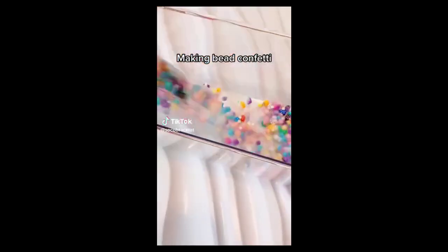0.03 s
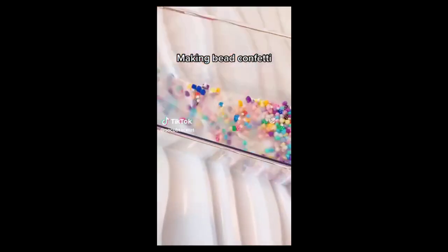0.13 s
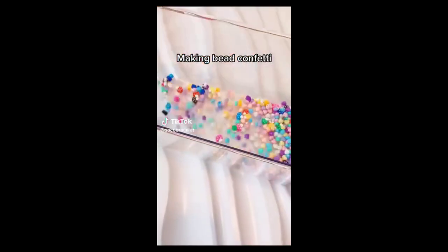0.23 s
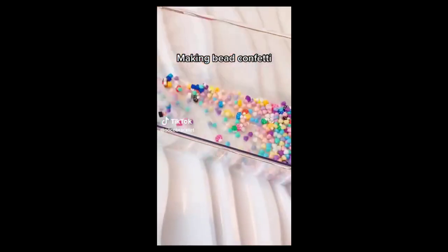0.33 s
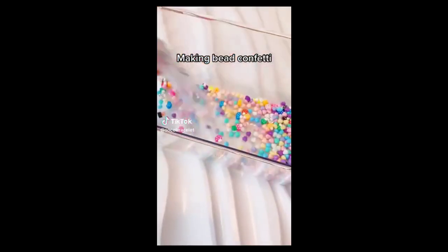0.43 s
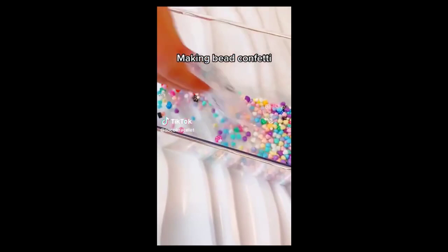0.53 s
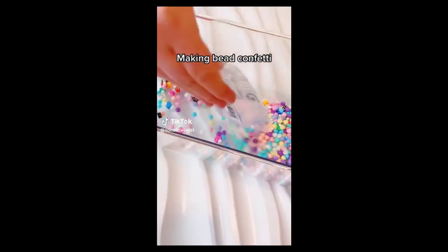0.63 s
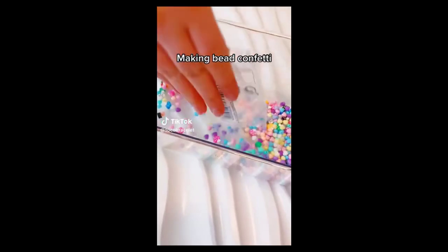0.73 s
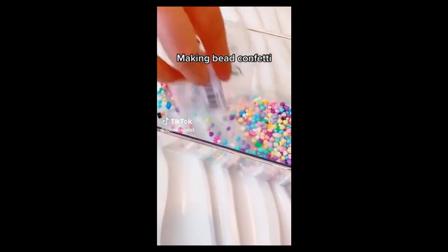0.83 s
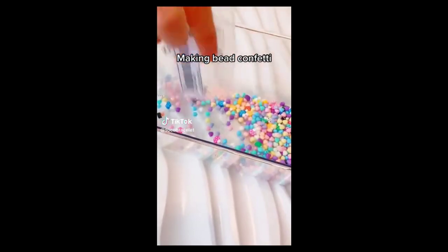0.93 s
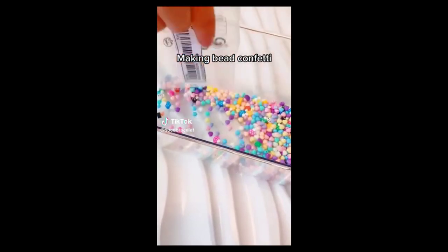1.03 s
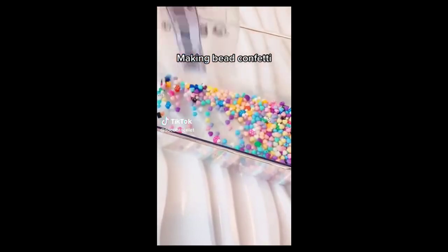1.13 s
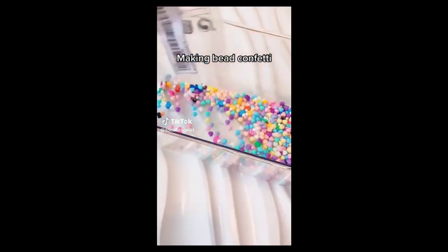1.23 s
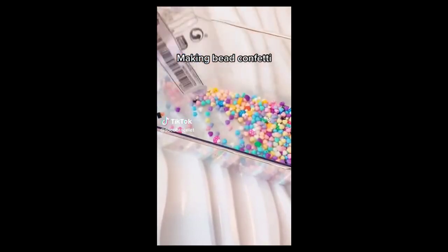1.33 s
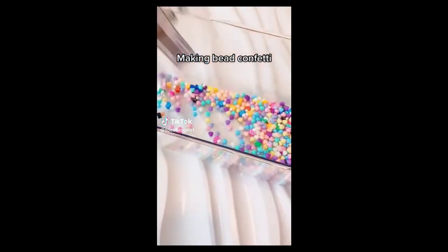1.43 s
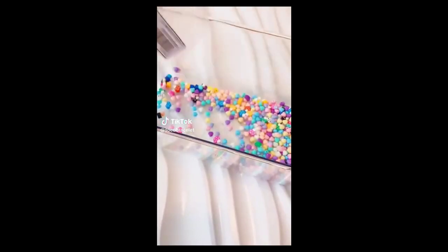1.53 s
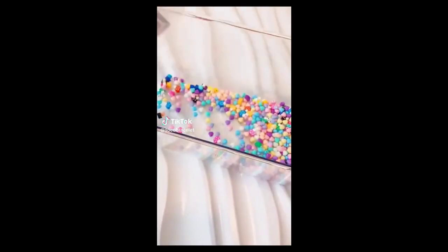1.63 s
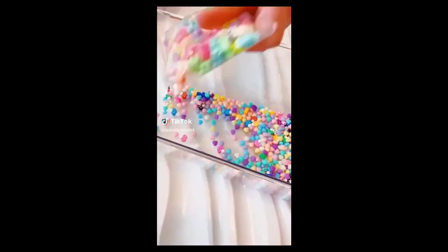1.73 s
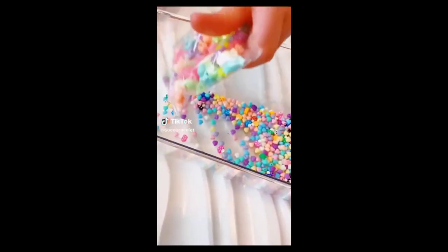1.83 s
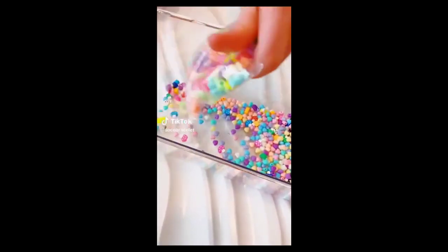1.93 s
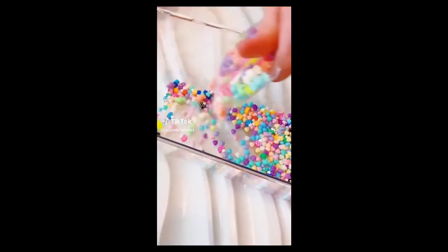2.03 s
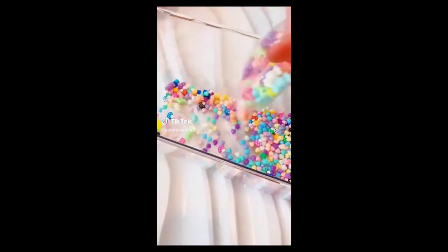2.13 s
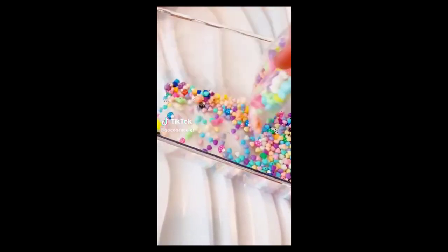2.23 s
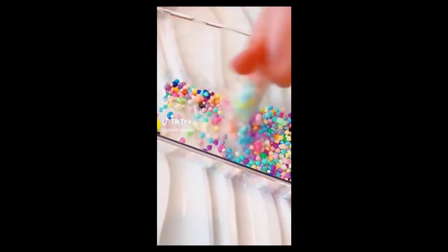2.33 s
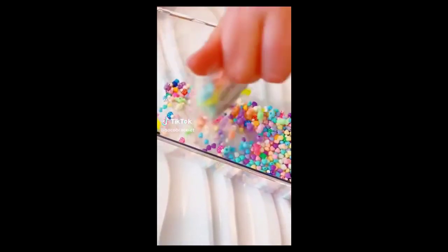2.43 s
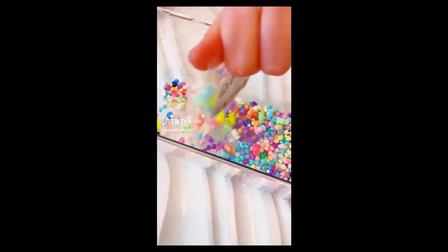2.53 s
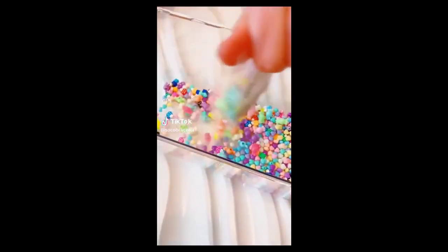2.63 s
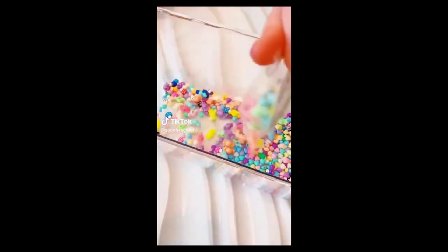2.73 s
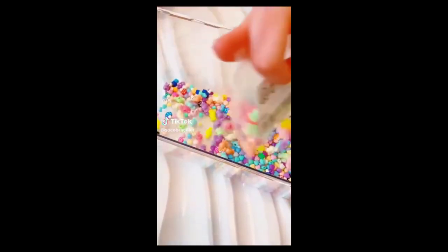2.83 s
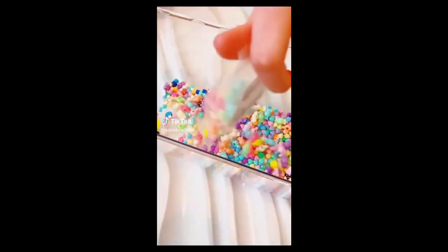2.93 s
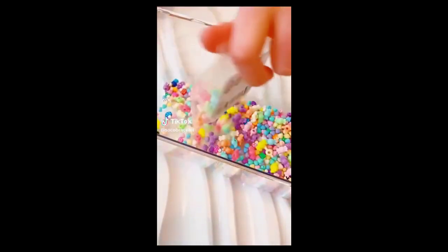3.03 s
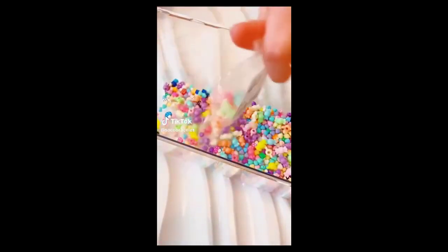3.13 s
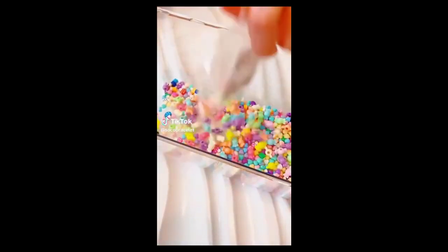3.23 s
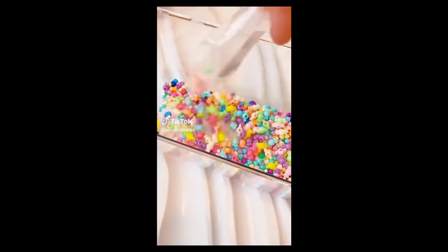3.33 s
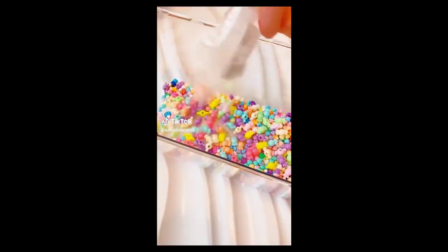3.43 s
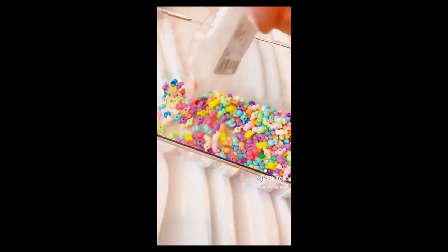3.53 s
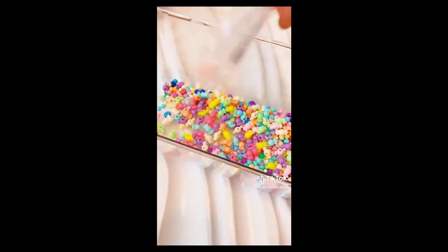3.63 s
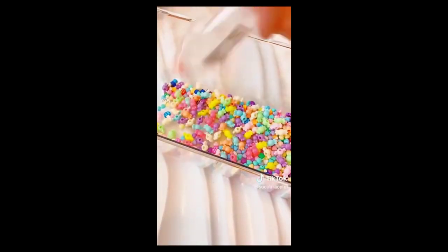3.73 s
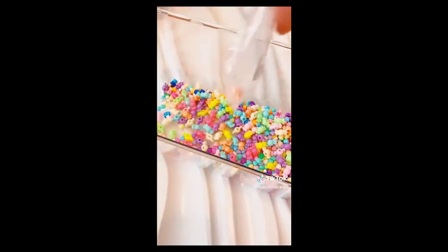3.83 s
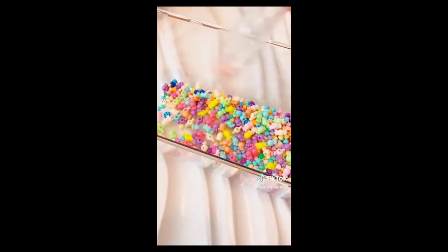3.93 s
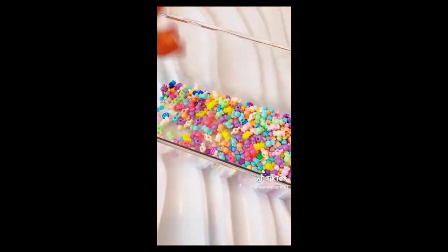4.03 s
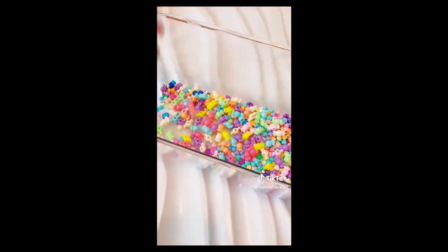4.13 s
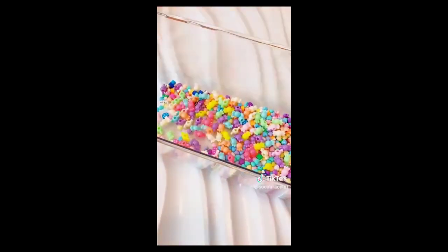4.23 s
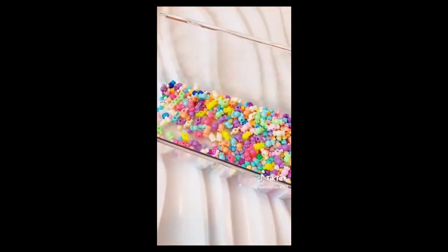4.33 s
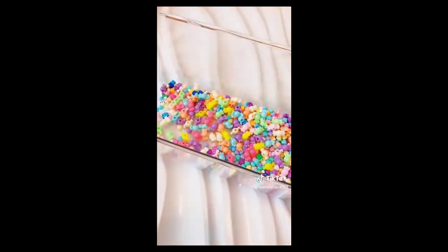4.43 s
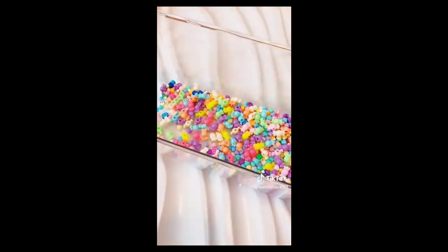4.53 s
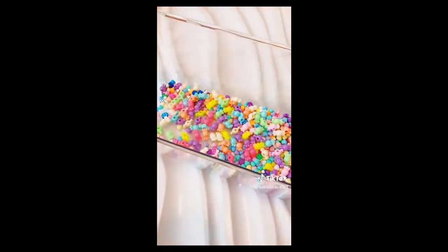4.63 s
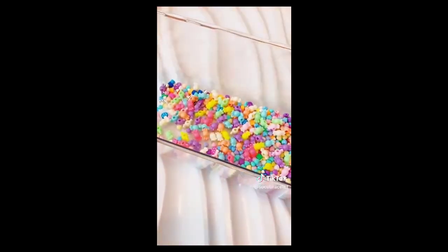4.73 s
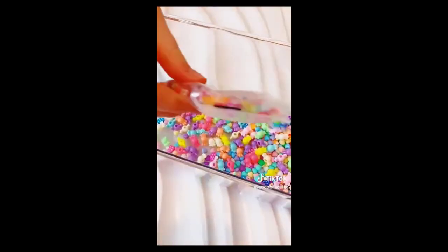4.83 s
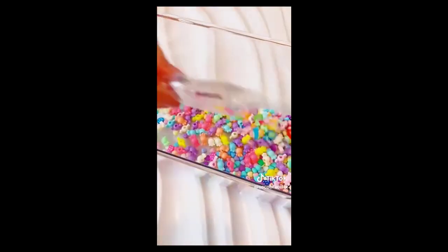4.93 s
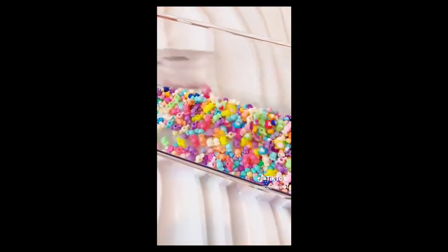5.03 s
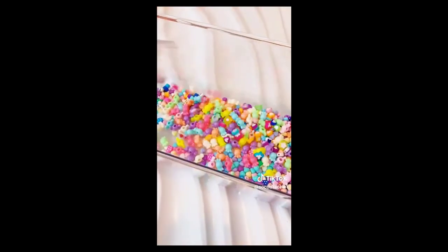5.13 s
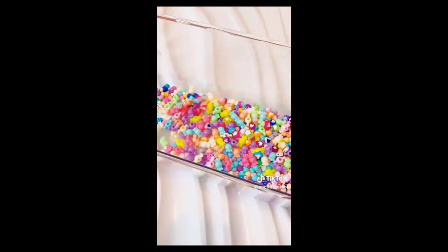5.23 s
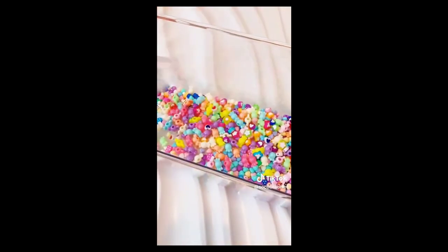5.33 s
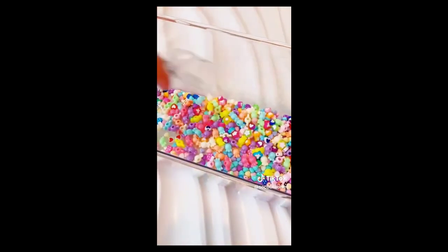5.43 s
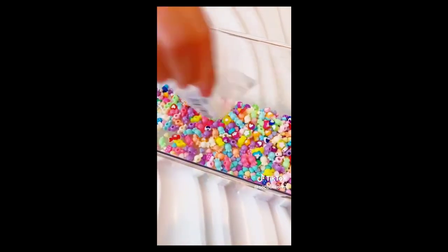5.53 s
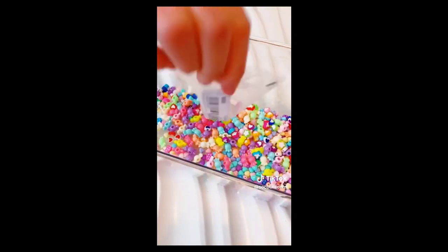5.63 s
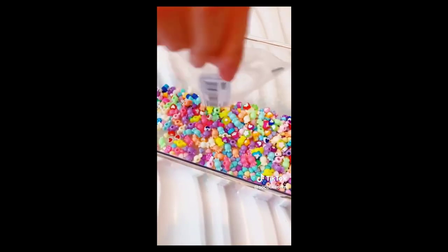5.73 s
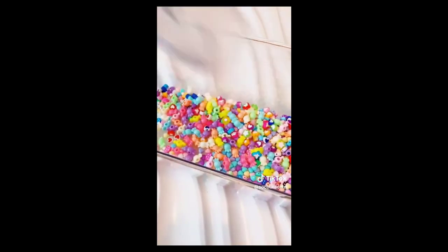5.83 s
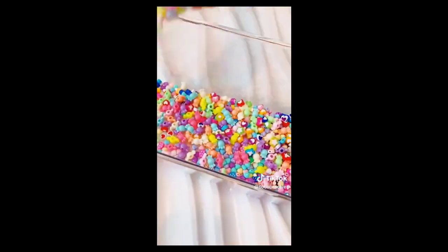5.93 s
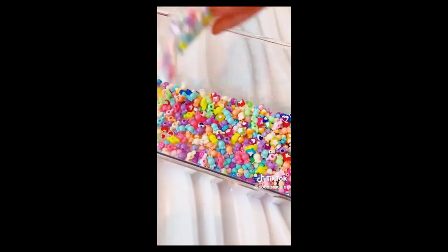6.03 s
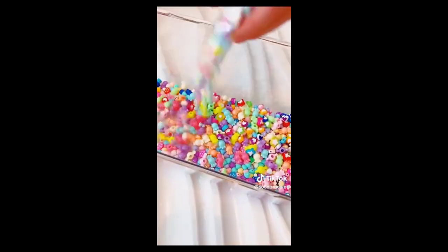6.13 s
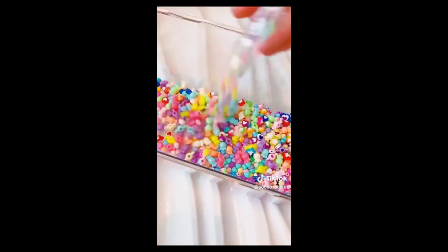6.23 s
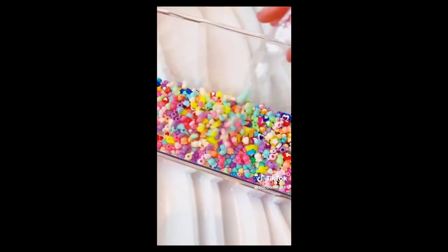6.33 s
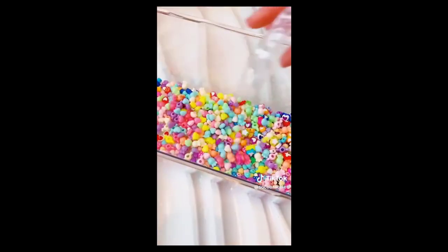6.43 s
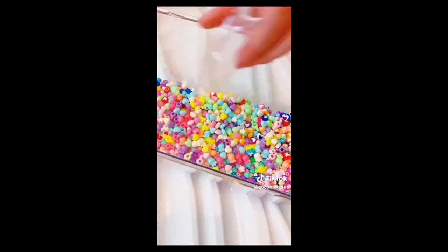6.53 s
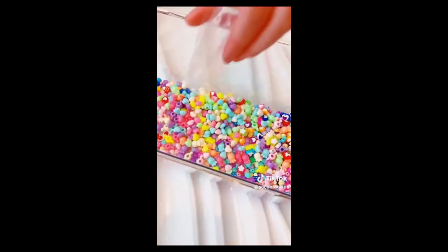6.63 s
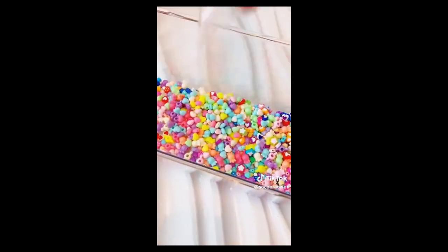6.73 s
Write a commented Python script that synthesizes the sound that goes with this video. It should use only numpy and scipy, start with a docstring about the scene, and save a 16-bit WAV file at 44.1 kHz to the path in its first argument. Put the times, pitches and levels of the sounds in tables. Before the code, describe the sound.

Small plastic beads gush from a crinkling bag into a hard plastic tray in bright, rattling bursts with brief pauses between them.

```python
"""A bag rustles briefly over a faint mains hum, then plastic beads gush into a hard plastic tray in a small room.
Each gush is a random stream of contacts whose level swells, holds and trickles out; clumps are denser flurries.
Every contact excites the heap and the tray's modes (knocks) and rings brightly from bead to bead (clicks).
The bag's film rustles as filtered contacts, crackles as a driven resonance and pops as its creases snap over.
Bumps thud through the tray's base; noise tails give the room, and hum and coloured noise lie underneath."""
import sys
import numpy as np
from scipy import signal
from scipy.fft import rfft, irfft, next_fast_len
from scipy.io import wavfile
from scipy.ndimage import uniform_filter1d

SR = 44100
rng = np.random.default_rng(int(sys.argv[2]) if len(sys.argv) > 2 else 0)


def unload_wav(signal):
    """Save mono or channel-first audio to the path in sys.argv[1] as 16-bit WAV at rate SR, clipped to [-1, 1]."""
    wavfile.write(
        sys.argv[1],
        SR,
        np.round(np.clip(np.atleast_2d(signal).T, -1, 1) * 32767).astype(np.int16),
    )


N = 299439
TIME = np.arange(N) / SR
CUTOFF_HZ = 15900   # top of the audible band kept
SPOTS_PER_S = 25    # the beads move to a new spot this often
SIDES = np.array([[1], [-1]])   # left, right


def from_db(db):
    """Logarithmic level: decibels to amplitude gain."""
    return 10 ** (np.asarray(db) / 20)


def in_time(rows):
    """Linear interpolation: the columns of a curve at every sample."""
    s, *columns = np.transpose(rows)
    return [np.interp(TIME, s, c) for c in columns]


def unit(x):
    """Energy normalisation: each channel is scaled to a summed square of one."""
    return x / np.sqrt(np.sum(x ** 2, axis=-1, keepdims=True) + 1e-20)


def colour(x, spectrum):
    """Spectral shaping: a gain curve over log frequency, scaled so that white sound keeps its power."""
    hz, db = np.transpose(spectrum)
    size = next_fast_len(N + 4096)
    bins = np.maximum(np.fft.rfftfreq(size, 1 / SR), 1)
    gain = from_db(np.interp(np.log(bins), np.log(hz), db))
    band_power = np.mean(gain ** 2 * (bins < CUTOFF_HZ))
    return irfft(rfft(x, size) * gain / np.sqrt(band_power), size)[..., :N]


def smooth(x, kind, hz):
    """Second-order filtering: Butterworth low-pass or high-pass."""
    sos = signal.butter(2, min(hz, .45 * SR), kind, fs=SR, output="sos")
    return signal.sosfilt(sos, x + 1e-18)


def resonance(x, hz, width_hz):
    """Modal resonance: a damped two-pole mode with a gain of about one at its peak."""
    r = np.exp(-np.pi * width_hz / SR)
    zeros = np.array([1, 0, -1]) * (1 - r * r) / 2
    poles = [1, -2 * r * np.cos(2 * np.pi * hz / SR), r * r]
    return signal.lfilter(zeros, poles, x + 1e-18)


def pitched_ring(pitch, low_hz, high_hz, t60, t):
    """Exponential decay: a dying sine of unit energy, its pitch 0-1 spread evenly over log frequency."""
    hz = low_hz * (high_hz / low_hz) ** pitch
    return unit(np.sin(2 * np.pi * hz * t) * from_db(-60 * t / t60))


def dying_noise(t60, size=2048):
    """Diffuse decay: a dense ring of unit energy, different on each side."""
    return unit(rng.standard_normal((2, size)) * from_db(-60 * TIME[:size] / t60))


def contacts(per_s, spread_db):
    """Random impacts: touches of either sign at a mean rate; with a spread, most are light and a few hard."""
    sizes = from_db(spread_db * np.minimum(rng.exponential(1, N), 4)) * rng.choice([-1, 1], N)
    return sizes * (rng.random(N) < per_s / SR)


def burst(touches, s, rise_s, fall_s):
    """Exponential envelope: a flurry around one moment, with the energy of rms one over 10 ms."""
    start = max(int((s - 6 * rise_s) * SR), 0)
    span = slice(start, int((s + 8 * fall_s) * SR))
    t = TIME[span] - s
    envelope = np.exp(np.minimum(t / rise_s, -t / fall_s))
    return span, unit(touches[span] * envelope) * np.sqrt(SR / 100)


SAG_DB_PER_S = 1.5   # a gush or rustle sags while it lasts
# the trickle stops this long after the hold, with this extra fall
TRICKLE_S, EMPTY_DB_PER_S = 0.52, 199


def swell(start_s, attack_s, hold_s, fall_db_per_s):
    """Envelope of a flow: smooth attack (half gain at the start), sagging hold and linear fall in dB."""
    t = TIME - start_s
    after = np.maximum(t - hold_s, 0)
    sag_db = SAG_DB_PER_S * np.clip(t, 0, hold_s)
    fall_db = fall_db_per_s * after + EMPTY_DB_PER_S * np.maximum(after - TRICKLE_S, 0)
    return (.5 + .5 * np.tanh(t / attack_s)) * from_db(-np.minimum(sag_db + fall_db, 200))


# Spectrum of the still room. Each row: frequency in Hz, relative density in dB per Hz.
AIR = [(25, -15), (45, 5.5), (90, -1), (130, -12), (205, -0.5), (270, -18.5), (360, -27), (900, -28.5),
       (4000, -30.5), (15000, -51)]
# Strength of the mains hum. Each row: time in seconds, rms level in dB.
HUM = [(0, -59.5), (1.4, -59.5), (1.7, -55), (2.06, -50), (2.12, -61.5), (4.3, -58), (5.5, -57.5),
       (6.79, -63)]
AIR_DB, HUM_HZ = -65.5, 60


def background():
    """Steady tone and broadband noise: mains hum and the low, nearly central murmur of still air."""
    mid, side = colour(rng.standard_normal((2, N)), AIR)
    hum = from_db(in_time(HUM)[0]) * np.sqrt(2) * np.sin(2 * np.pi * HUM_HZ * TIME)
    return hum + from_db(AIR_DB) * (mid + from_db(-26) * side * SIDES)


# Rustles of the bag's film in the hand, and a faint settling of beads at 1.52 s. Each row: start in seconds,
# hold in seconds, relative level in dB.
RUSTLES = [(0, 0.035, -52), (1.108, 0.18, -43), (1.521, 0.25, -59.5), (1.92, 0.1, -49), (5.046, 0.035, -37),
           (5.757, 0.13, -38.5), (6.13, 0.13, -54), (6.696, 0.18, -42)]
# Gushes of beads out of the bag, and slides of beads within it. Each row: start in seconds, attack in seconds,
# hold in seconds, then relative # levels in dB of the clatter on the tray, bead-on-bead clicking, rolling and
# thud through the tray's base, # and run-out in dB per second.
GUSHES = [(0.163, 0.0049, 0.19, -28, -26.5, -37, -52, 71.5),
          (0.441, 0.047, 0.14, -29, -27.5, -59.5, -51, 50),
          (0.737, 0.042, 0.32, -31.5, -27.5, -63.5, -46.5, 90.5),
          (2.012, 0.047, 0.053, -40, -43, -45.5, -46.5, 115),
          (2.107, 0.021, 0.1, -29.5, -29, -47.5, -49, 74.5),
          (2.414, 0.06, 0.81, -34, -33, -43.5, -48.5, 62), (3.28, 0.035, 0.27, -30, -28.5, -53, -42, 51),
          (3.872, 0.006, 0.099, -46.5, -49, -74, -78.5, 185),
          (4.059, .004, 0.02, -52.5, -45.5, -46, -66.5, 235),
          (4.462, 0.0038, 0.22, -54.5, -53, -51, -73, 228), (5.084, 0.012, 0.17, -30.5, -28, -42, -48, 25),
          (6.15, .02, 0.11, -52, -42, -53, -84, 150), (6.268, 0.024, 0.3, -31.5, -29, -38, -53, 97)]
RUSTLE_ATTACK_S, RUSTLE_FALL_DB_PER_S = 0.0012, 224.5
# a rustle stirs the beads inside and shakes the tray's base (dB against the rustle)
RUSTLE_STIR_DB, RUSTLE_THUD_DB = -6, -42.5
STILL_DB = -100   # floor under every level


def flow():
    """Power addition: gushes and rustles sum to the levels of clatter, clicking, rolling and thud, in dB."""
    power = np.full((4, N), from_db(STILL_DB) ** 2)
    for s, attack_s, hold_s, *levels_db, fall in GUSHES:
        power += np.outer(from_db(levels_db), swell(s, attack_s, hold_s, fall)) ** 2
    for s, hold_s, db in RUSTLES:
        levels_db = [db + RUSTLE_STIR_DB, db, STILL_DB, db + RUSTLE_THUD_DB]
        envelope = swell(s, RUSTLE_ATTACK_S, hold_s, RUSTLE_FALL_DB_PER_S)
        power += np.outer(from_db(levels_db), envelope) ** 2
    return 10 * np.log10(power)


def stream(clatter_db, click_db, full_per_s, thinning, spread_db, even_s, clatter_gain_db, click_gain_db):
    """Impact density: a stronger flow has more contacts a second; returns tray knocks and bead clicks."""
    per_s = full_per_s * from_db(thinning * (clatter_db - clatter_db.max()))
    touches = contacts(per_s, spread_db)
    # even out the power over a short window, so that the level curves set it
    power = uniform_filter1d(touches ** 2, int(even_s * SR) + 1)
    touches = touches / np.sqrt(np.abs(power) + per_s / SR / 2)
    return touches * from_db([clatter_db + clatter_gain_db, click_db + click_gain_db])


# Spectra of bead on bead and of rustling film. Each row: frequency in Hz, relative density in dB per Hz.
CLICK = [(1500, -51), (3800, -1), (4850, 1.5), (5500, -9), (6200, 3), (8300, 4.5), (10200, 4), (11600, -7),
         (13000, 3), (14400, 5.5), (15700, -12)]
FILM = [(1500, -7.5), (3800, -11.5), (4800, -3.5), (7500, 1.5), (10000, 1), (12000, -5.5), (14000, -1),
        (15700, -5.5)]


def treble(clicks, clatter_db, knee_db, knee_width_db):
    """Spectral cross-fade: bead-on-bead clicks in a full stream give way to the film's rustle as it thins."""
    bead_share = .5 + .5 * np.tanh((clatter_db - knee_db) / knee_width_db)
    bead_gain = np.sqrt(bead_share)
    return colour(clicks * bead_gain, CLICK) + colour(clicks * (1 - bead_gain), FILM)


# Clumps of beads landing or jolting together. Each row: time in seconds, relative level in dB of the clatter,
# and of the clicking.
CLUMPS = [(0.06,-49.5,-55), (0.081,-64,-47), (0.155,-25,-26), (0.696,-32.5,-29), (0.769,-26.5,-30.5),
          (0.786,-27,-28.5), (0.803,-42,-40), (0.843,-22.5,-27), (0.939,-27,-34), (1.17,-45,-35),
          (1.234,-56,-37), (1.354,-51.5,-43.5), (1.752,-49.5,-55), (1.769,-46,-59), (1.8,-59,-65),
          (1.866,-55.5,-57), (2.093,-23.5,-23), (2.12,-22,-35), (2.15,-22.5,-31), (2.171,-32,-33.5),
          (2.201,-29.5,-42), (2.248,-25.5,-31), (2.311,-29,-27), (2.345,-35.5,-35.5), (2.375,-32,-40.5),
          (2.415,-32.5,-37), (2.429,-30.5,-32), (2.454,-26.5,-36), (2.472,-37,-32.5), (2.512,-30,-29.5),
          (2.543,-24.5,-31.5), (2.578,-27,-35.5), (2.592,-29,-36), (2.623,-36,-31.5), (2.662,-23,-30.5),
          (2.69,-21,-29.5), (2.707,-32,-46.5), (2.75,-27,-29.5), (2.756,-29,-37.5), (2.773,-27.5,-45),
          (2.813,-30.5,-35), (2.83,-23.5,-33), (2.883,-30,-37), (2.933,-23.5,-32.5), (2.965,-31,-34),
          (3.01,-32.5,-45), (3.048,-28.5,-38), (3.1,-33.5,-24.5), (3.144,-34.5,-26.5), (3.193,-28.5,-26.5),
          (3.237,-25.5,-28.5), (3.261,-27.5,-31), (3.303,-27.5,-29), (3.337,-28.5,-28), (3.459,-28.5,-28.5),
          (3.504,-51.5,-31), (3.639,-32.5,-29.5), (3.655,-23,-28), (3.77,-26,-28), (3.858,-24,-26.5),
          (3.927,-37,-36), (3.975,-38,-52), (4.062,-44.5,-49), (4.091,-39,-60), (4.12,-48,-65),
          (4.164,-49,-67), (4.211,-55,-66.5), (4.243,-65,-68.5), (4.33,-59.5,-66.5), (4.444,-35.5,-29.5),
          (4.454,-31.5,-40), (4.481,-43.5,-52), (4.49,-42,-56), (4.533,-38.5,-43.5), (4.624,-49,-53),
          (4.697,-44.5,-61), (4.781,-52,-64), (4.906,-64,-74), (5.029,-54,-48.5), (5.082,-23.5,-27),
          (5.11,-26.5,-30), (5.126,-30.5,-32), (5.144,-31.5,-29), (5.347,-41,-28), (5.374,-31.5,-26),
          (5.445,-26.5,-33.5), (5.504,-33,-32), (5.52,-30,-31.5), (5.617,-28.5,-26), (5.633,-38,-35),
          (5.693,-26.5,-30), (5.735,-27,-31.5), (6.142,-75,-42.5), (6.19,-48,-50), (6.235,-35,-34),
          (6.271,-22,-29.5), (6.303,-23,-51), (6.363,-24,-40), (6.407,-32,-38), (6.428,-22.5,-31)]
CLUMP_RISE_S, KNOCK_FALL_S, CLICK_FALL_S = .0012, .0042, .0033
# smaller clumps fall at random, at this level against the stream
SMALL_CLUMPS_PER_S, SMALL_CLUMP_DB = 13, -2.5


def clumps(clatter_db, click_db, per_s, spread_db, knock_fall_s, click_fall_s, gain_db):
    """Clustered impacts: a clump is a tight flurry with a sudden front; small ones follow the stream's level."""
    touches, out = contacts(per_s, spread_db), np.zeros((2, N))
    starts = np.flatnonzero(rng.random(N) < SMALL_CLUMPS_PER_S / SR)
    small = [(TIME[i], clatter_db[i] + SMALL_CLUMP_DB, click_db[i] + SMALL_CLUMP_DB) for i in starts]
    for s, *levels_db in CLUMPS + small:
        for layer, (db, fall_s) in enumerate(zip(levels_db, (knock_fall_s, click_fall_s))):
            span, flurry = burst(touches, s, CLUMP_RISE_S, fall_s)
            out[layer, span] += from_db(db + gain_db) * flurry
    return out


def heap(strikes, ring_t60, ring_db, apart_db, echo_t60, echo_db, low_hz, high_hz, ping_t60, ping_db,
         width_db, count, active):
    """Impulse response: the stream wanders over a few active spots, each with its own ring and reflections."""
    step, t = N // count + 1, TIME[:2048]
    spot, out = np.arange(N) // step + rng.integers(0, active, N), np.zeros((2, N))
    for k, (place, pitch) in enumerate(rng.random((count + active - 1, 2))):
        ping = pitched_ring(pitch, low_hz, high_hz, ping_t60, t)
        response = from_db(ping_db) * ping + from_db(ring_db) * dying_noise(ring_t60)[0]
        response = response + from_db(apart_db) * dying_noise(ring_t60)    # each side hears it differently
        response = response + from_db(echo_db) * dying_noise(echo_t60)     # tray walls and table
        response[:, 0] += 1     # the contact itself
        response = unit(response) * from_db(place * width_db * SIDES)   # leans left by its place
        first = max(k + 1 - active, 0) * step
        span = slice(first, (k + 1) * step)
        struck = strikes[span] * (spot[span] == k)
        sound = signal.fftconvolve(struck[None], response, axes=-1)[:, :N - first]
        out[:, first:first + sound.shape[1]] += sound
    return out


TICK_RING_T60, TICK_CRACK_T60 = .016, .002   # seconds
TICK_WIDTH_DB = 8   # full range of the gain scatter on each side


def lone_beads(level_db, per_s, spread_db, gain_db, low_hz, high_hz):
    """Isolated impact: a single hard hit is a dry tick over the stream, with its own pitch and place."""
    out, t = np.zeros((2, N + 512)), TIME[:512]
    starts = np.flatnonzero(rng.random(N) < per_s / SR)
    for i, (pitch, place, softness) in zip(starts, rng.random((len(starts), 3))):
        ping = pitched_ring(pitch, low_hz, high_hz, TICK_RING_T60, t)
        tick = unit(ping + dying_noise(TICK_CRACK_T60, size=512)[0])
        pan_db = (place - .5) * TICK_WIDTH_DB * SIDES
        out[:, i:i + len(t)] += tick * from_db(level_db[i] + gain_db - spread_db * softness + pan_db)
    return out[:, :N]


# Bumps of the hand or the bag on the tray. Each row: time in seconds, relative level in dB.
BUMPS = [(0.062, -43.5), (1.655, -50), (1.765, -44), (1.799, -46), (2.119, -33), (2.2, -39), (2.689, -42.5),
         (2.83, -48.5), (4.237, -55), (4.44, -38.5), (5.125, -52), (5.621, -31), (5.692, -29)]
BUMP_RISE_S, BUMP_FALL_S = 0.0042, 0.004


def bumps():
    """Impulsive force: soft, brief noise shoves against the base of the tray."""
    push, out = rng.standard_normal(N), np.zeros(N)
    for s, db in BUMPS:
        span, shove = burst(push, s, BUMP_RISE_S, BUMP_FALL_S)
        out[span] += from_db(db) * shove
    return out


# Where the beads land. Each row: time in seconds, place from 0 near the wall to 1 in the middle.
LANDING = [(1.3, 0.054), (2.2, 0.23), (2.7, 0.9), (3.6, 0.5), (4.4, 0.15), (5.7, 0.1), (6.4, 0.4)]
# Resonances of the loaded tray. Each row: frequency in Hz, width in Hz, drive in dB over a bare contact near
# the wall, and in the middle, both before the scatter from spot to spot.
TRAY = [(343, 33, 6.5, 6.5), (596, 118, 12, 19), (703, 69, 14, 6), (1048, 38, 15.5, 3), (1605, 87, -1, -1),
        (2130, 71, -7.5, -12), (3128, 33, -3, 5.5), (3870, 180, -2, -0.5)]
SPOT_DB, SPOT_DETUNE = 4, .02   # scatter from spot to spot: strength (+- dB), tuning (+- share)


def tray_modes(knocks, count):
    """Modal excitation: the landing place sets each mode's drive; every spot weights and tunes it anew."""
    middle, out = np.clip(in_time(LANDING)[0], 0, 1), 0
    spot = (TIME * SPOTS_PER_S).astype(int)
    for hz, width, wall_db, middle_db in TRAY:
        scatter_db = SPOT_DB * rng.uniform(-1, 1, spot[-1] + 1)[spot]
        drive = from_db(wall_db + middle * (middle_db - wall_db) + scatter_db)
        tuning = rng.integers(0, count, spot[-1] + 1)[spot]
        for k, shift in enumerate(np.linspace(-SPOT_DETUNE, SPOT_DETUNE, count)):
            out = out + resonance(knocks * (drive * (tuning == k)), hz * (1 + shift), width)
    return out


# Spectra of a contact through the tray's base and on its floor. Each row: frequency in Hz, relative density
# in dB per Hz.
THUD = [(60, -23), (130, -6.5), (200, -5), (270, -5.5), (340, -1.5), (550, -2.5), (900, -2), (2000, -15),
        (8000, -63)]
CLATTER = [(80, -17), (200, -23), (450, -18.5), (900, -12.5), (1350, -5.5), (1900, 1), (2900, -0.5),
           (4400, -3), (5400, -18), (8000, -35)]
BASE_LOWEST_HZ = 90   # the tray is too small to radiate below this
CLATTER_LEAN_DB = 1.1   # right over left


def tray(knocks, weight_db, bare_db):
    """Plate radiation: knocks ring the tray, a little to the right; knocks and bumps thud through its base."""
    modes = tray_modes(knocks, count=3)
    thud = smooth(colour(from_db(weight_db) * knocks + bumps(), THUD), "high", BASE_LOWEST_HZ)
    lean_db = -CLATTER_LEAN_DB / 2 * SIDES
    clatter = colour(knocks + modes, CLATTER) * from_db(lean_db)
    return from_db(bare_db) * (clatter + thud * from_db(4 * lean_db))   # the thud leans further


# Modes of the floor under rolling beads. Each row: frequency in Hz, width in Hz, relative level in dB.
FLOOR = [(674, 130, -4.5), (1060, 75, -10.5), (1648, 88, 6.5), (2120, 240, 3)]


def rolling(roll_db, per_s, spread_db, detune, count):
    """Mass loading: small taps keep the floor ringing; its load of beads retunes it from spot to spot."""
    taps, spot = contacts(per_s, spread_db), (TIME * SPOTS_PER_S).astype(int)
    ring = 0
    for hz, width, db in FLOOR:
        tuning = rng.integers(0, count, spot[-1] + 1)[spot]
        for k, shift in enumerate(np.linspace(-detune, detune, count)):
            ring = ring + from_db(db) * resonance(taps * (tuning == k), hz * np.exp(shift), width)
    return from_db(roll_db) * unit(ring) * np.sqrt(N)


# Squeezes that pull the bag taut. Each row: start in seconds, hold in seconds, pitch of the film in Hz,
# relative level in dB.
SQUEEZES = [(0.145, 0.3, 2260, -73), (1.61, 0.19, 2340, -60), (6.145, 0.039, 1400, -54)]


def crackle(per_s, spread_db, width_hz):
    """Driven resonance: while the bag is squeezed, tiny creases keep its taut film ringing."""
    creases, out = contacts(per_s, spread_db), 0
    for s, hold_s, hz, db in SQUEEZES:
        ring = unit(resonance(creases, hz, width_hz)) * np.sqrt(N)
        out = out + from_db(db) * swell(s, RUSTLE_ATTACK_S, hold_s, RUSTLE_FALL_DB_PER_S) * ring
    return out


# Resonances of the rest of the bag. Each row: frequency in Hz, width in Hz, level in dB against the pop.
PACKET = [(1380, 180, -11), (3400, 580, -9), (4400, 270, -8.5), (7000, 1800, -21)]
# Spectrum of a snapping crease. Each row: frequency in Hz, relative density in dB per Hz.
CRACK = [(150, 1.5), (400, -14), (1500, -7.5), (4200, -5), (5400, -6), (7500, 3), (10800, -8.5), (12500, 4),
         (15700, -12.5)]
# Creases of the bag snapping over, and a few single hard cracks played alike. Each row: time in seconds,
# relative pop level in dB, pitch of the film in Hz, # width in Hz, relative crack level in dB, length in
# seconds.
SNAPS = [(1.547, -52, 2420, 350, -40, 0.0025), (1.5795, -33.5, 2300, 280, -58, 0.0012),
         (1.627, -45, 2110, 220, -38.5, 0.0068), (1.6763, -27.5, 2320, 237, -50, 0.0012),
         (1.904, -28, 2260, 240, -28, 0.0087), (1.923, -38, 4100, 400, -20, 0.00098),
         (1.926, -32, 2300, 300, -17.5, 0.01), (3.86, -23.5, 3920, 260, -34, 0.00074),
         (3.9235, -40, 3980, 400, -27.5, 0.00081), (4.44, -45, 4000, 600, -19, .0008),
         (4.859, -36.5, 4900, 850, -75, 0.0003)]
FILM_LOWEST_HZ = 221   # the thin film radiates little below this


def bag(rise_s, gain_db):
    """Snap-through buckling: a crease flips with a thin crack and a sharp pop, and the whole packet rings."""
    pops, cracks, slips = np.zeros(N), np.zeros(N), rng.standard_normal(N)
    flip = signal.unit_impulse(2048)
    packet = sum(from_db(db) * unit(resonance(flip, hz, width)) for hz, width, db in PACKET)
    for s, pop_db, hz, width_hz, crack_db, length_s in SNAPS:
        span, flurry = burst(slips, s, rise_s, length_s)
        cracks[span] += from_db(crack_db) * flurry
        pop = unit(resonance(resonance(flip, hz, width_hz), hz, 2 * width_hz))
        start = int(s * SR)
        pops[start:start + len(flip)] += from_db(pop_db) * unit(pop + packet) * np.linalg.norm(flurry)
    thin_cracks = smooth(colour(cracks, CRACK), "high", FILM_LOWEST_HZ)
    return from_db(gain_db) * (pops + thin_cracks) * np.ones((2, 1))


def room(x, t60, wet_db, wall_hz):
    """Reverberation: a short, diffuse tail, duller than the direct sound."""
    tail = signal.oaconvolve(x, dying_noise(t60, size=22000), axes=-1)[:, :N]
    return x + from_db(wet_db) * smooth(tail, "low", wall_hz)


def microphones(x, apart_hz):
    """Spatial coherence: two ports close together hear the long waves alike."""
    mid, side = (x[0] + x[1]) / 2, smooth((x[0] - x[1]) / 2, "high", apart_hz)
    return np.array([mid + side, mid - side])


def scene():
    """Superposition: beads, tray and bag sound together in the room."""
    clatter_db, click_db, roll_db, thud_db = flow()
    strikes = stream(clatter_db, click_db, full_per_s=2200, thinning=0.66, spread_db=0.0, even_s=0.01,
                     clatter_gain_db=1.46, click_gain_db=-2.5)
    landings = clumps(clatter_db, click_db, per_s=7000, spread_db=1.5,
                      knock_fall_s=KNOCK_FALL_S, click_fall_s=CLICK_FALL_S, gain_db=-0.5)
    knocks, clicks = strikes + landings
    # on the heap, levels are against the bare contact and t60 in seconds
    knocks = heap(knocks, ring_t60=.013, ring_db=10.0, apart_db=2.0, echo_t60=0.2, echo_db=3.0,
                  low_hz=1505, high_hz=4670, ping_t60=.035, ping_db=-4.0, width_db=1.5, count=110, active=5)
    clicks = heap(clicks, ring_t60=.025, ring_db=1.5, apart_db=-1.0, echo_t60=0.088, echo_db=0,
                  low_hz=5090, high_hz=14270, ping_t60=.02, ping_db=-7, width_db=0.5, count=150, active=4)
    knocks = knocks + lone_beads(clatter_db, per_s=200, spread_db=10, gain_db=19.5, low_hz=1000, high_hz=5000)
    clicks = clicks + lone_beads(click_db, per_s=170, spread_db=10, gain_db=16.5, low_hz=4000, high_hz=14000)

    struck_tray = tray(knocks, thud_db - clatter_db, bare_db=-6.5)
    rolled_floor = rolling(roll_db, per_s=900, spread_db=6, detune=0.06, count=7)
    rattle = room(struck_tray + rolled_floor, t60=0.3, wet_db=-4.5, wall_hz=7140)
    bright = treble(clicks, clatter_db, knee_db=-41.5, knee_width_db=9.5)
    clicking = room(bright, t60=0.19, wet_db=-1.0, wall_hz=11200)
    film = bag(rise_s=.0008, gain_db=-8.5) + crackle(per_s=200, spread_db=3, width_hz=260)
    crinkle = room(film, t60=.16, wet_db=-17, wall_hz=7000)
    return microphones(rattle + clicking + crinkle, apart_hz=271.5) + background()


def record(dry):
    """Saturation and band-limiting: the hardest peaks are rounded and the top is cut steeply."""
    rounded = .55 * np.tanh(dry / .55)
    return signal.sosfilt(signal.ellip(10, .1, 80, CUTOFF_HZ, fs=SR, output="sos"), rounded)


dry = scene()
out = record(dry)
unload_wav(out)
```